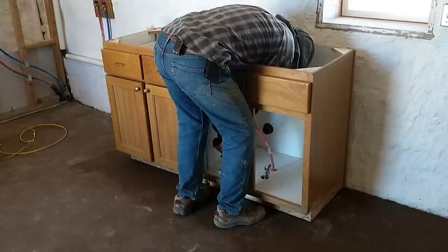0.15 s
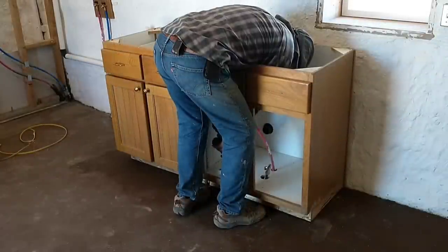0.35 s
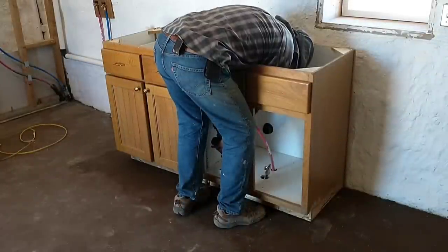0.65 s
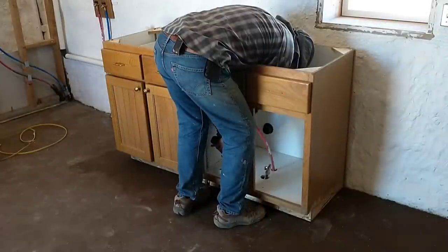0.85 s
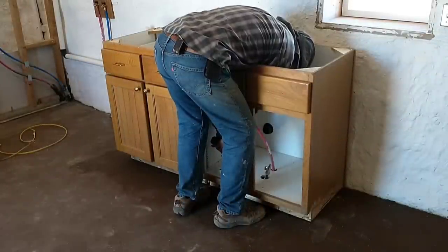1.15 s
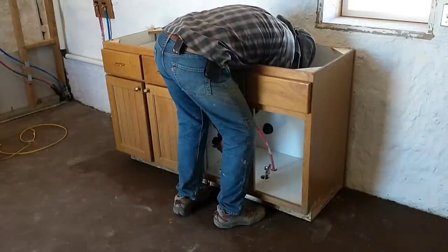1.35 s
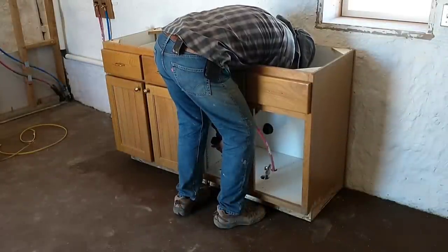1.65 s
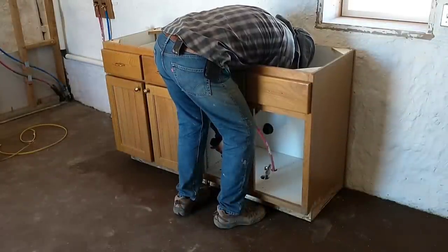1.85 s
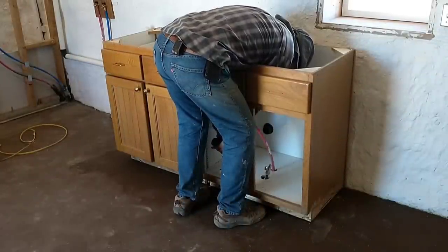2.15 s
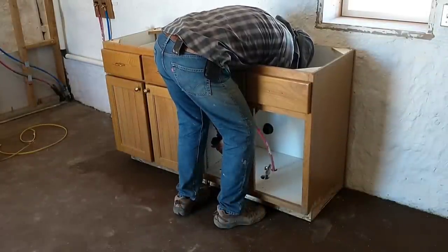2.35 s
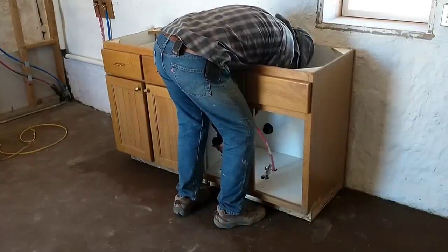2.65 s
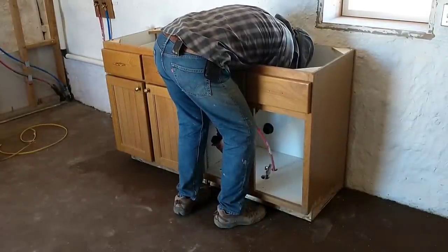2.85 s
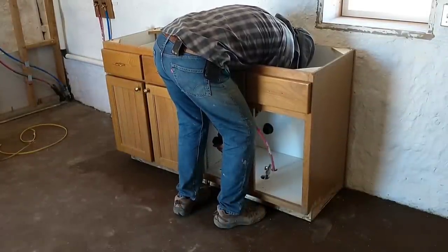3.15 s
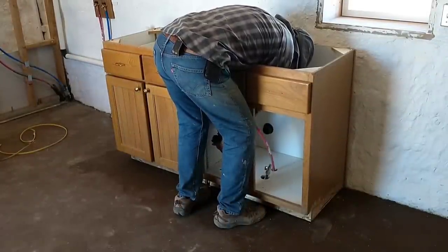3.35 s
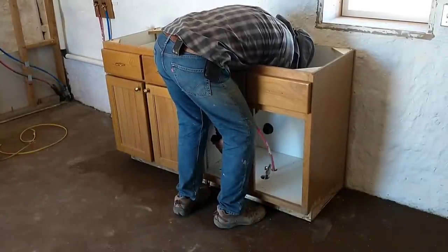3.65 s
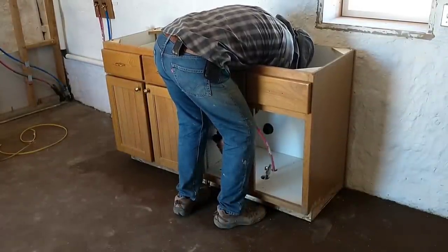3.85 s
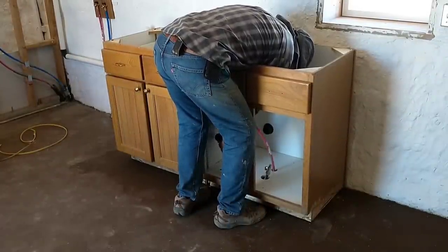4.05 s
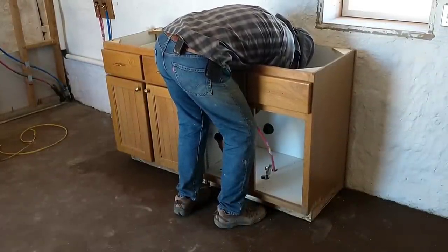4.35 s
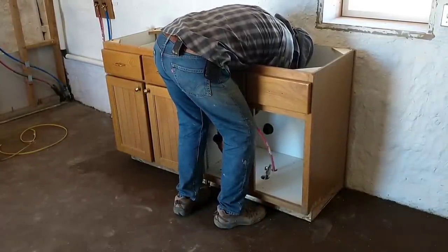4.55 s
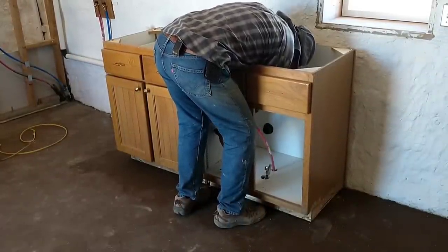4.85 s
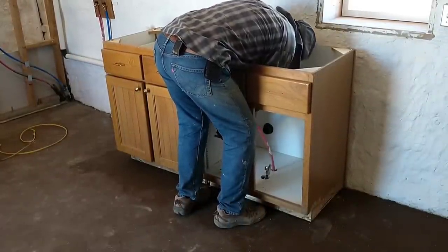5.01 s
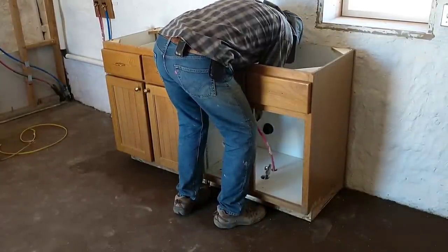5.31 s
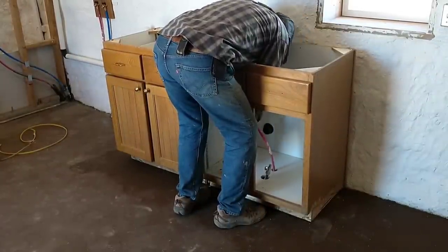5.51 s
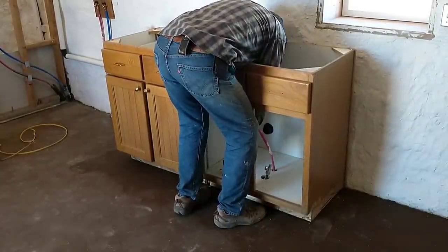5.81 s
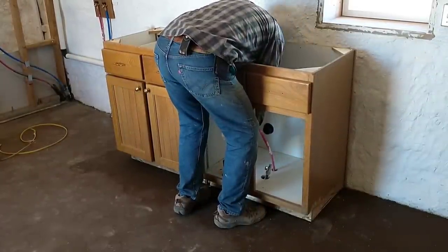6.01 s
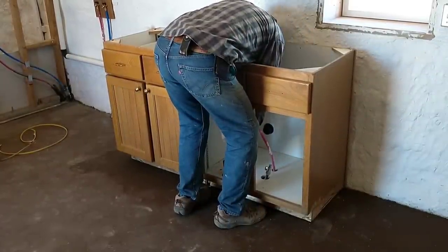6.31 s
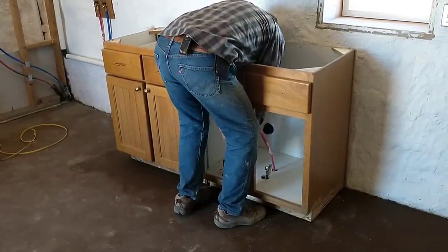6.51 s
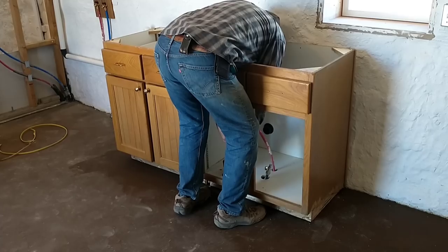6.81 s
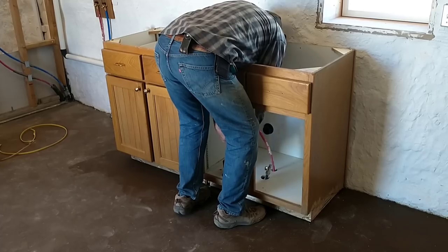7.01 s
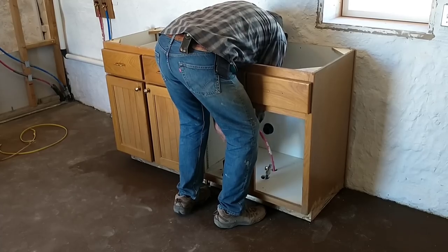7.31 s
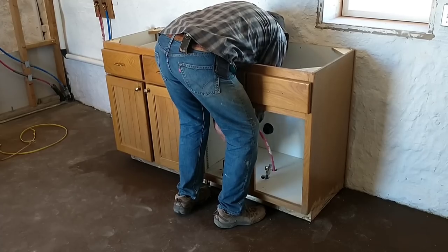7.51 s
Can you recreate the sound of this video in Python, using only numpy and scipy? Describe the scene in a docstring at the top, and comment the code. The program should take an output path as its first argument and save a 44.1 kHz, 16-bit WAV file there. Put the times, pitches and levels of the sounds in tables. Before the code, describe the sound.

Rapid chugging saw strokes, about forty per second, tear through cabinet wood with gritty rasp, low panel buzz and bright steel sizzle. The trigger is released and pulled again several times, with a slight motor whine and jolt at restarts. After several bursts comes a near-quiet gap with dull wooden knocks and a short scrape, then a final steady cut continues. The microphone is a few metres away in a hard-walled, lightly echoing room.

```python
"""Bare room: a reciprocating saw cuts inside a wooden cabinet in bursts, a few metres away.
Each stroke shakes the panels (tones on multiples of the stroke rate, plus rumble) and drags the teeth
through wood (noise throbbing once a stroke: rasp from the panels, sizzle and pings from the blade).
Trigger pulls bring motor whine and a jolt; snags ring the blade. In the long pause the tool is
shifted: it knocks the cabinet (decaying modes) and scrapes over wood (noise)."""
import sys
import numpy as np
from scipy import signal
from scipy.fft import rfft, irfft, next_fast_len
from scipy.io import wavfile
from scipy.ndimage import uniform_filter1d

SR = 44100
rng = np.random.default_rng(int(sys.argv[2]) if len(sys.argv) > 2 else 0)


def bounce(signal):
    """Save signal as a 16-bit WAV file at the path given by the first command-line argument."""
    frames = np.transpose(np.atleast_2d(signal))
    limited = np.clip(frames, -1, 1)
    pcm = np.round(limited * 32767).astype(np.int16)
    wavfile.write(sys.argv[1], SR, pcm)


N = 338095
T = np.arange(N) / SR


def undb(db):
    """Amplitude gain of a level in dB."""
    return 10 ** (np.asarray(db) / 20)


def level(x, db):
    """Scale to an rms level in dB."""
    return x * undb(db) / np.sqrt(np.mean(x ** 2))


def along(table, hz):
    """Interpolate (f/Hz, value) rows on a log frequency axis."""
    f, value = np.array(table).T
    return np.interp(np.log(hz + 1), np.log(f + 1), value)


def curves(tables):
    """Join tables that start with t/s; return the other columns at every sample."""
    s, *columns = np.concatenate(tables).T
    return [np.interp(T, s, c) for c in columns]


def colour(x, shape, peaks=(), between_db=0.):
    """Minimum-phase filter: spectrum shape times a floor plus resonance peaks."""
    size = 8192
    hz = np.arange(size // 2 + 1) * SR / size
    resonances = sum(undb(db) / np.hypot(1, 2 * (hz - f) / w) for f, w, db in peaks)
    gain = undb(along(shape, hz)) * (undb(between_db) + resonances)
    cepstrum = irfft(np.log(gain))
    cepstrum[1:size // 2] *= 2  # fold to causal
    cepstrum[size // 2 + 1:] = 0
    impulse = irfft(np.exp(rfft(cepstrum)))
    return signal.oaconvolve(x, impulse[None], axes=1)[:, :N]


# left-right likeness of noise: f/Hz, correlation
LIKENESS = [(60, 0.99), (130, 0.89), (290, 0.79), (640, 0.58), (1400, 0.035), (3100, 0.13), (7000, 0.16),
            (15000, 0.089)]


def pair(size=N):
    """Two-channel noise: alike in the bass, nearly unrelated in the treble."""
    fast = next_fast_len(size)
    alike = np.clip(along(LIKENESS, np.arange(fast // 2 + 1) * SR / fast), -1, 1)
    mid, side = rfft(rng.standard_normal((2, fast)))
    mid = mid * np.sqrt((1 + alike) / 2)
    side = side * np.sqrt((1 - alike) / 2)
    return irfft(np.array([mid + side, mid - side]), fast)[:, :size]


def walk(rate_hz):
    """Random values held 1 / rate_hz and smoothed twice."""
    hold = int(SR / rate_hz)
    steps = np.repeat(rng.standard_normal(N // hold + 1), hold)
    return uniform_filter1d(uniform_filter1d(steps, hold), hold)[:N]


def ring(s, db, hz, t60_s, push_s):
    """One decaying mode, struck at time s; push_s softens the onset."""
    t = np.arange(int(1.2 * t60_s * SR)) / SR
    out, at = np.zeros(N + len(t)), int(s * SR)
    decay = 1000 ** (-t / t60_s)
    onset = 1 - np.exp(-t / push_s)
    out[at:at + len(t)] = undb(db) * np.sin(2 * np.pi * hz * t) * decay * onset
    return out[:N]


def burst(s, db, fade_s):
    """Envelope of a sudden sound that dies away exponentially."""
    return undb(db) * np.exp(-np.clip(T - s, 0, None) / fade_s) * (T > s)


def dulled(x, hz, top_db):
    """Change what lies above hz by a moving gain."""
    low = signal.sosfiltfilt(signal.butter(3, hz, fs=SR, output="sos"), x)
    return low + (x - low) * undb(top_db)


STAGE_ENDS_S = (3.9, 5.6)


def stages():
    """Shares over time: blade deep in the first board, breaking out of it, then in a new board."""
    first, second = (np.clip((T - s) / 0.064, 0, 1) for s in STAGE_ENDS_S)
    return 1 - first, first - second, second


BETWEEN_DB = (-3.5, -1, 1.5)  # floor between resonances, one a stage


def staged(source, shapes, peaks):
    """The same excitation takes each stage's colour in turn."""
    out = 0
    for share, shape, floor_db in zip(stages(), shapes, BETWEEN_DB):
        out = out + np.sqrt(share) * level(colour(source, shape, peaks, floor_db), 0)
    return out


# trigger pulls: start t/s, stroke step/s, time to full bite/s, release t/s,
# motor whine nominal level/dB, jolt nominal level/dB
TRIGGER_PULLS = [(-1.0, .03, .1, -.085, -120, -120), (.147, .038, .16, 2.085, -49, -66),
                 (2.199, .026, .05, 4.19, -56, -44), (4.339, .026, .04, 4.42, -52, -40),
                 (4.553, .027, .04, 4.965, -58, -39), (6.106, .022, .22, 9.0, -70, -54)]
FIRST_BITE = .55  # share of a step taken at once
SILENT_DB = -120


def trigger(fall_db_s, bend=.85, linger_s=0.):
    """Layer level in dB: the bite grows stroke by stroke after each pull, then dies after release."""
    rise, fall = [], []
    for start, step_s, rise_s, stop, *_ in TRIGGER_PULLS:
        steps = (np.floor((T - start) / step_s) + FIRST_BITE) * (T > start)
        bite = uniform_filter1d(steps, size=300) * step_s / rise_s
        rise.append(bend * 20 * np.log10(np.clip(bite, 1e-9, 1)))
        fall.append(-fall_db_s * np.clip(T - stop - linger_s, 0, None))
    return np.clip(np.max(np.add(rise, fall), axis=0), SILENT_DB, 0)


# panel take-up of upper multiples, one table a stage: f/Hz, level/dB
PANEL_TAKE_UP = [
    [(250, -8), (300, -12), (340, -19), (380, -13), (500, -28)],
    [(250, -14), (300, -22), (340, -26), (380, -26), (500, -28)],
    [(230, -19), (285, -21), (305, -11), (340, -24), (500, -27)],
]
# low multiples: multiple of stroke rate, level over the deepest tone's curve/dB
LOW_MULTIPLES = [(2, -15), (3, -1)]
MIDDLE_MULTIPLES, UPPER_MULTIPLES = (4, 5, 6), (7, 8, 9, 10, 12)
SPREAD_RAD = 1.15  # per multiple squared: higher multiples lag, spreading the push over the stroke
PANELS_LINGER_S, TONES_LINGER_S = .025, .2  # after release; middle tones ring on longest
BUZZ_FALL_DB_S = 190


def buzz(turns, rate, deep_db, middle_db, upper_db):
    """Like pushes each stroke make the panels hum on multiples of the stroke rate; each wavers alone."""
    on_db = trigger(BUZZ_FALL_DB_S, .8, PANELS_LINGER_S)
    ringing_db = trigger(BUZZ_FALL_DB_S, .15, TONES_LINGER_S)
    lines = [(k, deep_db + db + on_db + 2.2 * walk(9)) for k, db in LOW_MULTIPLES]
    lines += [(k, db + ringing_db) for k, db in zip(MIDDLE_MULTIPLES, middle_db)]
    for k in UPPER_MULTIPLES:
        take_up_db = sum(share * along(shape, k * rate) for share, shape in zip(stages(), PANEL_TAKE_UP))
        lines.append((k, upper_db + on_db + take_up_db + 3.5 * walk(9)))
    out = 0
    for k, db in lines:
        # the wave reaches the two channels from a shifting side
        skew = 0.028 * k * walk(5.5) * np.array([[1], [-1]])
        lag = SPREAD_RAD * k * k + (.1 + .017 * k * k) * walk(20)
        out = out + undb(db + 1.5 * walk(25)) * np.sin(2 * np.pi * int(k) * turns + lag + skew)
    return np.sqrt(2) * out


def throb(turns, depth_db):
    """Teeth bite hardest as the pull begins, fade, brush again on the return; strokes vary."""
    phase, stroke = turns % 1, turns.astype(int)
    bite = rng.standard_normal((stroke[-1] + 1, 2))[stroke]
    pull = np.exp(-phase / 0.57) * (1 + 0.28 * bite[:, 0])
    back = 0.14 * np.exp(-((phase + .5) % 1) / 0.067) * (1 + 1.3 * bite[:, 1])
    return undb(depth_db * uniform_filter1d(pull + back, size=300))


# cabinet panel resonances: f/Hz, width/Hz, level/dB
PANEL_MODES = [(299, 13, 2), (384, 14, 7), (513, 24, 8.5), (624, 14, 0), (770, 24, 6), (921, 20, 4),
               (1113, 24, 6), (1281, 14, -3), (1384, 16, 7), (1468, 16, 1), (2200, 60, 3)]
# panel rumble spectrum, one table a stage: f/Hz, relative level/dB per Hz
RUMBLE_SPECTRA = [
    [(15, -68), (25, -29), (75, -12), (114, 3), (243, 5.5), (330, -11.5), (372, -16.5), (600, -10.5),
     (780, -38), (1320, -120)],
    [(15, -83), (25, -29.5), (81, -8), (161, 0), (260, -6), (339, -17), (436, -29), (512, -17.5),
     (600, -21), (780, -52), (1320, -120)],
    [(15, -64), (25, -37), (60, -12), (167, 4), (253, -11), (297, -5.5), (436, -31), (505, -12), (600, -29),
     (780, -67), (1320, -120)],
]
RUMBLE_DB, RUMBLE_FALL_DB_S = -7, 200  # level over the upper tones' curve


def rumble(turns, upper_db):
    """Stroke-throbbing noise through the three lowest panel resonances."""
    shaking = staged(pair() * throb(turns, 6.7), RUMBLE_SPECTRA, PANEL_MODES[:3])
    return shaking * undb(upper_db + RUMBLE_DB + trigger(RUMBLE_FALL_DB_S, .8, PANELS_LINGER_S))


# rasp spectrum, one table a stage: f/Hz, relative level/dB per Hz
RASP_SPECTRA = [
    [(210, -31), (350, -9), (1220, -5.5), (1420, -7), (1610, -6.5), (3000, -8.5), (3900, -54.5),
     (6600, -120)],
    [(210, -29.5), (350, -18.5), (434, -9.5), (511, -6), (675, -10.5), (3000, -15), (3900, -44),
     (6600, -120)],
    [(210, -16.5), (350, -16), (506, -4.5), (579, -5), (899, -4), (1900, -5), (3000, -9.5), (3900, -46),
     (6600, -120)],
]
RASP_DB, RASP_FALL_DB_S = .3, 165  # level over the cut's curve


def rasp(turns, fibres, quiet_db, cut_db):
    """Teeth tearing wood: grainy, throbbing noise through the panel resonances."""
    tearing = staged(pair() * throb(turns, 5.6) * fibres, RASP_SPECTRA, PANEL_MODES)
    tearing = dulled(tearing, 1300, 0.25 * quiet_db)
    return tearing * undb(cut_db + RASP_DB + trigger(RASP_FALL_DB_S, .6, PANELS_LINGER_S))


# blade ping spectrum: f/Hz, relative level/dB per Hz
PING_SPECTRUM = [(1500, -39), (2900, -8.5), (3300, -0.5), (3800, 0), (4500, -16), (9000, -40)]
PING_DB = (-7, -12, -14)  # over the sizzle, one a stage


def ping(turns):
    """The steel pings as each pull begins, harder or softer stroke by stroke."""
    hard = undb(2.5 * rng.standard_normal(int(turns[-1]) + 1))[turns.astype(int)]
    strokes = uniform_filter1d(hard * np.exp(-(turns % 1) / .12), size=220)
    return level(colour(pair() * strokes, PING_SPECTRUM), 0) * undb(np.dot(PING_DB, stages()))


# blade steel resonances: f/Hz, width/Hz, level/dB
BLADE_MODES = [(3195, 50, -1), (3299, 50, -1), (3455, 130, -4.5), (3790, 150, -11), (5545, 200, -19.5)]
# sizzle spectrum, one table a stage: f/Hz, relative level/dB per Hz
SIZZLE_SPECTRA = [
    [(1350, -34), (2300, -8), (2850, -10), (3430, -6.5), (5000, -9.5), (5680, -9.5), (7220, -15.5),
     (8010, -13), (10700, -22.5), (15600, -27.5)],
    [(1350, -22), (2300, -2), (2850, -5.5), (3460, -1), (4260, -3.5), (6400, -8), (9550, -13.5),
     (10700, -20.5), (13000, -23), (15600, -26)],
    [(1350, -29), (2300, -11), (3810, -1), (4960, -4), (5370, -1), (6510, -6), (8820, -10.5),
     (10700, -17.5), (12200, -17.5), (15600, -21)],
]
SIZZLE_DB, SIZZLE_FALL_DB_S = 1.9, 350  # level over the sizzle curve


def sizzle(turns, fibres, quiet_db, cut_db):
    """Grainy, throbbing noise through the blade's resonances, with pings."""
    steel = staged(pair() * throb(turns, 5.8) * fibres, SIZZLE_SPECTRA, BLADE_MODES) + ping(turns)
    steel = dulled(dulled(steel, 4500, .55 * quiet_db), 10000, .6 * quiet_db)
    return steel * undb(cut_db + SIZZLE_DB + .6 * walk(7) + trigger(SIZZLE_FALL_DB_S, 1.05))


# motor pick-up spectrum: f/Hz, relative level/dB per Hz
WHINE_SPECTRUM = [(1700, -40), (1980, 0), (2060, -1), (2400, -40)]
WHINE_FADE_S, WHINE_LEAD_S = .07, .012  # heard just before the blade moves


def whine():
    """Narrow-band noise of the motor picking up, dying away after each pull."""
    swell = sum(burst(start - WHINE_LEAD_S, db, WHINE_FADE_S) for start, *_, db, _ in TRIGGER_PULLS)
    swell = uniform_filter1d(swell, size=500, origin=249)  # averages the past only
    return level(colour(pair(), WHINE_SPECTRUM), 0) * swell


# gear jolt spectrum: f/Hz, relative level/dB per Hz
JOLT_SPECTRUM = [(100, -2), (200, 3), (600, -6), (3200, -10), (4200, -22), (12000, -45)]
JOLT_FADE_S = .035


def jolt():
    """Gears take up their play at each pull: a short noise burst."""
    hit = sum(burst(start, db, JOLT_FADE_S) for start, *_, db in TRIGGER_PULLS)
    return level(colour(pair(), JOLT_SPECTRUM), 0) * uniform_filter1d(hit, size=150)


# cut, one table a burst: t/s, rasp level/dB, sizzle over rasp/dB, deepest panel tone level/dB,
# upper panel tones level/dB (nominal)
CUT_LEVELS = [
    [(0.0, -34, -3, -41, -31), (0.12, -28, -6, -41, -33), (0.15, -39, -4, -41, -33),
     (0.2, -35, -5, -41, -30), (0.29, -32, -2, -41, -32), (0.348, -33, -4, -36, -31),
     (0.738, -32, -2, -34, -32), (0.908, -34, -1, -37, -30), (1.146, -32, -1, -34, -31),
     (1.192, -32, -2, -39, -30), (1.41, -33, -6, -33, -34), (1.56, -31, -2, -41, -30),
     (1.814, -31, -5, -38, -35), (1.99, -34, -4, -38, -30), (2.024, -37, -6, -54, -31),
     (2.08, -38, -11, -42, -33)],
    [(2.26, -33, -3, -35, -32), (2.52, -35, -4, -39, -29), (2.696, -38, -4, -49, -38),
     (2.754, -31, -4, -41, -38), (2.854, -33, -3, -36, -32), (3.03, -33, -7, -36, -39),
     (3.152, -37, -6, -47, -40), (3.216, -33, -8, -43, -44), (3.562, -31, -4, -39, -36),
     (3.892, -32, -6, -37, -37), (3.972, -35, -3, -48, -28), (4.126, -39, -3, -30, -31),
     (4.17, -39, -1, -31, -30)],
    [(4.36, -37, -9, -37, -34), (4.372, -32, -9, -35, -34), (4.396, -33, -8, -37, -31),
     (4.404, -37, -6, -40, -28), (4.43, -43, -4, -49, -28)],
    [(4.6, -36, -7, -45, -29), (4.618, -41, -2, -52, -26), (4.676, -33, -6, -41, -32),
     (4.788, -37, -4, -46, -28), (4.898, -33, -4, -31, -25), (4.96, -35, -8, -49, -26)],
    [(6.108, -42, -4, -44, -28), (6.124, -35, -6, -44, -24), (6.135, -30, -4, -44, -27),
     (6.26, -30, -7, -48, -32), (6.33, -33, -7, -49, -33), (6.348, -33, -6, -41, -34),
     (6.606, -34, -5, -45, -28), (6.666, -33, -5, -50, -29), (6.992, -35, -3, -35, -29),
     (7.174, -37, -3, -38, -29), (7.366, -37, -4, -35, -29), (7.66, -34, -6, -39, -29)],
]
# blade speed and panel tones, in consecutive tables: t/s, stroke rate/Hz,
# level/dB of the tones on 4, 5 and 6 times that rate (nominal)
BLADE_SPEED = [
    [(0.14, 40.1, -54, -62, -65), (0.168, 40.2, -47, -50, -75), (0.226, 39.9, -39, -42, -40),
     (0.352, 40.9, -40, -38, -38), (0.55, 40.8, -34, -36, -43), (0.814, 36.1, -52, -39, -38),
     (0.94, 36.5, -40, -42, -40), (1.15, 39.4, -45, -33, -35)],
    [(1.17, 39.6, -49, -31, -36), (1.32, 40.0, -35, -44, -41), (1.374, 41.1, -46, -38, -38),
     (1.488, 40.4, -34, -36, -42), (1.612, 39.5, -50, -33, -39), (1.88, 40.6, -38, -39, -47),
     (2.024, 39.8, -38, -39, -33), (2.19, 38.2, -56, -50, -54)],
    [(2.21, 41.2, -48, -43, -50), (2.222, 41.8, -38, -39, -41), (2.432, 35.7, -47, -35, -41),
     (2.568, 40.5, -35, -43, -37), (2.728, 41.8, -48, -47, -49), (2.862, 39.4, -39, -37, -39),
     (3.03, 41.6, -52, -46, -46), (3.2, 41.5, -42, -55, -53)],
    [(3.22, 43.1, -51, -51, -58), (3.39, 40.8, -50, -48, -41), (3.458, 40.2, -47, -44, -53),
     (3.616, 38.6, -50, -40, -40), (3.638, 38.5, -41, -38, -47), (3.78, 38.5, -49, -42, -53),
     (3.88, 37.9, -46, -43, -39), (3.9, 38.9, -46, -45, -59)],
    [(3.92, 39.5, -43, -42, -41), (3.978, 40.2, -30, -52, -33), (4.044, 38.1, -31, -35, -52),
     (4.11, 39.8, -36, -46, -40), (4.148, 40.6, -36, -35, -48), (4.194, 37.9, -30, -44, -46),
     (4.264, 41.0, -32, -46, -57), (4.32, 42.7, -55, -54, -58)],
    [(4.34, 42.5, -51, -49, -64), (4.398, 43.2, -27, -46, -47), (4.51, 38.9, -45, -47, -53),
     (4.596, 40.6, -29, -53, -48), (4.736, 40.5, -37, -51, -33), (4.822, 39.9, -30, -31, -41),
     (4.96, 41.8, -28, -39, -39), (5.2, 36.8, -56, -62, -58)],
    [(6.1, 37.8, -72, -57, -62), (6.128, 38.5, -48, -44, -54), (6.232, 40.7, -48, -50, -51),
     (6.304, 42.0, -39, -43, -58), (6.486, 41.4, -31, -36, -65), (6.512, 41.3, -30, -36, -49),
     (6.87, 39.2, -31, -38, -48), (6.9, 39.1, -36, -32, -49)],
    [(6.92, 39.0, -37, -34, -45), (6.974, 38.6, -45, -28, -52), (7.042, 37.7, -32, -36, -42),
     (7.374, 34.9, -45, -30, -38), (7.412, 34.7, -39, -30, -49), (7.45, 33.9, -43, -37, -36),
     (7.594, 35.2, -47, -28, -49), (7.66, 35.7, -36, -34, -32)],
]


def saw():
    """Blade speed sags under pressure; strokes drive the cutting noise and, apart, the panel buzz."""
    rate, *middle_db = curves(BLADE_SPEED)
    rate = uniform_filter1d(rate, size=1200)  # the motor's mass smooths its speed
    rasp_db, sizzle_db, deep_db, upper_db = curves(CUT_LEVELS)
    turns = np.cumsum(rate) / SR
    fibres = undb(1.4 * walk(900))  # wood tears in grains about a millisecond long
    uneven_db = 1.3 * walk(18)  # uneven pressure on the blade
    quiet_db = trigger(SIZZLE_FALL_DB_S, .15)  # high tones die first; a restart is bright at once
    cut_db = rasp_db + uneven_db
    cut = rasp(turns, fibres, quiet_db, cut_db)
    cut = cut + sizzle(turns, fibres, quiet_db, cut_db + sizzle_db)
    cut = cut + rumble(turns, upper_db) + whine() + jolt()
    return cut, buzz(turns, rate, deep_db, middle_db, upper_db)


# air spectrum: f/Hz, relative level/dB per Hz
AIR_SPECTRUM = [(15, -35.5), (25, -6.5), (96, -1), (170, -5), (359, -23), (422, -13), (553, -17.5),
                (1080, -34.5), (1420, -34), (15600, -48)]
AIR_DB = -68


def air():
    """Faint steady noise of the air."""
    return level(colour(pair(), AIR_SPECTRUM), AIR_DB)


# teeth snags: t/s, nominal level/dB, ring f/Hz, crack over ring level/dB
BLADE_SNAGS = [(0.535, -20, 3150, -22), (0.706, -18, 3400, -22), (0.815, -16.5, 3760, -20.5),
               (1.0335, -17, 3190, -19.5), (1.164, -21, 3190, -18.5), (1.2413, -20, 3200, -20),
               (1.288, -26, 3720, -19), (1.485, -16, 3310, -19), (1.6092, -21.5, 3470, -23),
               (2.23, -29, 3290, -15), (2.4877, -20, 3310, -10), (2.74, -16.5, 3910, -21),
               (2.8563, -31.5, 3180, -21), (3.3493, -20, 3850, -18.5), (3.4645, -20, 3190, -20.5),
               (3.556, -19, 3180, -24), (3.6515, -14.5, 3320, -26), (3.9489, -18, 3440, -27),
               (4.8854, -19.5, 3940, -13), (4.9087, -28, 3470, -19.5), (6.4104, -20, 3400, -13),
               (6.7184, -27, 3880, 3)]
# snag crack spectrum: f/Hz, relative level/dB per Hz
CRACK_SPECTRUM = [(2000, -20), (5000, 3), (8000, -0.5), (12300, -6.5), (16000, -7)]


def snags():
    """Teeth snag: a short ring of the blade with a noise crack."""
    rings = sum(ring(s, db - 2.5, hz, .02, 0.00034) for s, db, hz, _ in BLADE_SNAGS)
    crack = sum(burst(s, db + crack_db - 3.5, .005) for s, db, _, crack_db in BLADE_SNAGS)
    return rings + level(colour(pair(), CRACK_SPECTRUM), 0) * crack


# idle tool sliding over wood: t/s, scrape level/dB
SCRAPE_LEVEL = [(5.43, -94), (5.437, -65), (5.502, -77), (5.51, -93), (5.732, -93), (5.75, -54.5),
                (5.856, -71.5), (5.87, -80), (5.96, -76), (6.077, -84), (6.082, -66), (6.1, -70)]


def scrape():
    """Metal slides over wood: noise with a gritty, fast-wavering level."""
    spectrum = [(100, -5), (300, 9.5), (700, 0.5), (1700, 0.5), (2800, -8), (4000, -27), (16000, -48.5)]
    grit = level(colour(pair() * undb(2.2 * walk(280)), spectrum), 0)
    return grit * undb(np.interp(T, *np.transpose(SCRAPE_LEVEL), left=-120, right=-120))


# tool knocks: t/s, thud nominal level/dB, tick over thud/dB, dull bump nominal level/dB
TOOL_KNOCKS = [(5.435, -55, -11, -70), (5.497, -62, -28, -51), (5.57, -66, -30, -53),
               (5.616, -66, -34, -47), (5.745, -39, -26, -60), (5.833, -52, -17, -62),
               (5.92, -56, -15, -60), (5.948, -56, -34, -43), (5.968, -63, -40, -43),
               (6.015, -60, -30, -55), (6.08, -63, -5, -70)]
# cabinet modes: f/Hz, level/dB, t60/s
CABINET_MODES = [(118, -13, .15), (164.5, 0.5, .25), (205, -4, .12), (275, -4, .1), (344, -7, 0.14),
                 (500, -5, 0.14), (770, -15, .1)]


def knocks():
    """The idle tool's soft knocks ring the cabinet's modes in new shares, each with a noise tick."""
    shares = rng.standard_normal((len(TOOL_KNOCKS), len(CABINET_MODES)))
    thud = 0
    for (s, db, *_), share in zip(TOOL_KNOCKS, shares):
        for (f, mode_db, t60_s), vary in zip(CABINET_MODES, share):
            thud = thud + ring(s, db + mode_db - 2.5 + 2.2 * vary, f, t60_s, 0.0075)
    tick = sum(burst(s, db + tick_db - 1.5, 0.0092) for s, db, tick_db, _ in TOOL_KNOCKS)
    spectrum = [(1000, -20.5), (2500, -2), (3900, -2), (5000, -9), (8000, -14), (16000, -30)]
    return thud + tick * level(colour(pair(), spectrum), 0)


BUMP_HZ, BUMP_T60_S = 105, .05


def bumps():
    """The whole carcass gives way briefly under each knock: a dull bump through the floor, no echo."""
    return sum(ring(s, db, BUMP_HZ, BUMP_T60_S, .003) for s, *_, db in TOOL_KNOCKS)


# echo octave bands: f/Hz, t60/s
ROOM_DECAY = [(90, 0.54), (180, 0.45), (360, 0.48), (720, 0.45), (1440, 0.27), (2880, 0.24), (5760, .14),
              (11500, 0.056)]


def room(x, wet_db=-3.5):
    """Bare walls: octave bands of noise echo, each dying at its own rate."""
    size = int(.7 * SR)
    t, noise, echo = np.arange(size) / SR, pair(size=size), 0
    for hz, t60_s in ROOM_DECAY:
        edges = [hz / np.sqrt(2), min(hz * np.sqrt(2), .45 * SR)]
        band = signal.sosfilt(signal.butter(4, edges, "band", fs=SR, output="sos"), noise)
        echo = echo + band * 1000 ** (-t / t60_s) / np.sqrt(t60_s * SR / (2 * np.log(1000)))
    echo = echo * np.clip(t / 0.0096, 0, 1)  # builds up over 9.6 ms
    return x + undb(wet_db) * signal.oaconvolve(x.mean(axis=0)[None], echo, axes=1)[:, :N]


def scene():
    """Cut, snags, knocks and scrape echo in the room; buzz, bumps and air are added without echo."""
    cut, hum = saw()
    return room(cut + snags() + knocks() + scrape()) + hum + bumps() + air()


# channel balance: f/Hz, left minus right level/dB
CHANNEL_BALANCE = [(60, 0.5), (110, -0.5), (200, -1.0), (380, 0), (700, -1), (1290, 0.5), (2380, -1.5),
                   (4400, 1.5), (8120, -1.5), (15000, -1.5)]
TOP_HZ = 15620


def record(dry):
    """The channels differ in colour, the left is two samples late; the top is cut."""
    half = np.array(CHANNEL_BALANCE) * [1, .5]
    left = colour(dry[:1], half)[0]
    right = colour(dry[1:], half * [1, -1])[0]
    left = np.r_[0, 0, left[:-2]]
    lowpass = signal.ellip(14, .2, 70, TOP_HZ, fs=SR, output="sos")
    return signal.sosfilt(lowpass, np.array([left, right]))


dry = scene()
out = record(dry)
bounce(out)
```